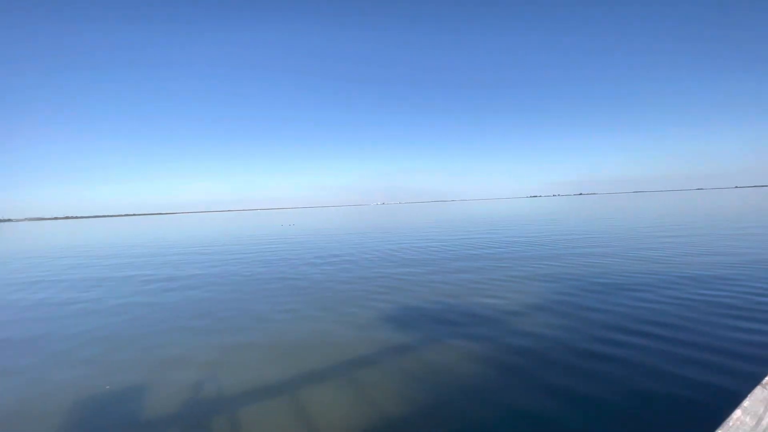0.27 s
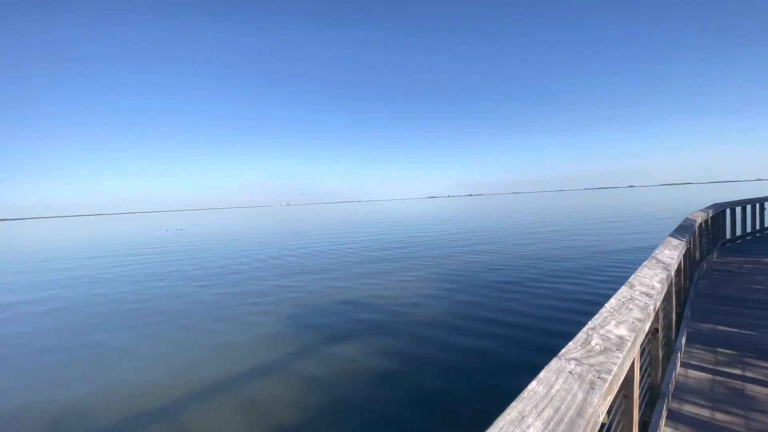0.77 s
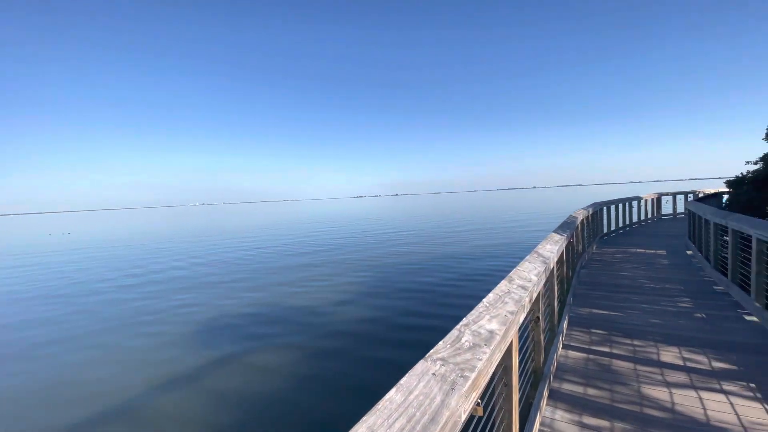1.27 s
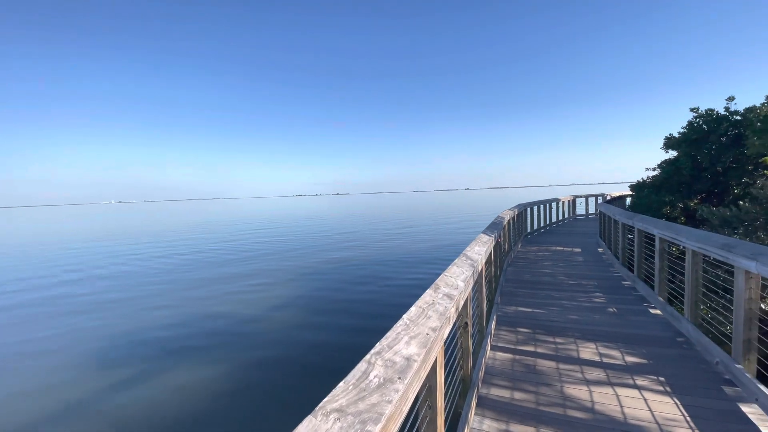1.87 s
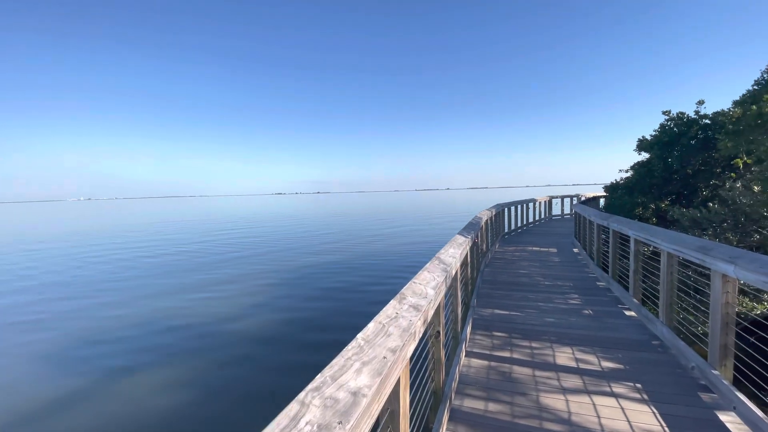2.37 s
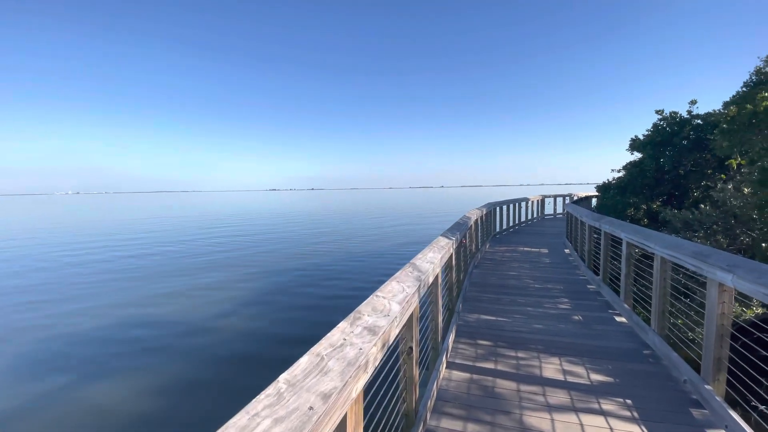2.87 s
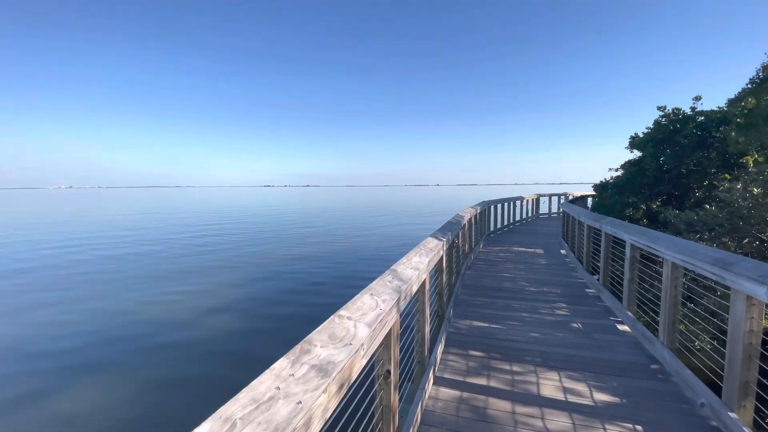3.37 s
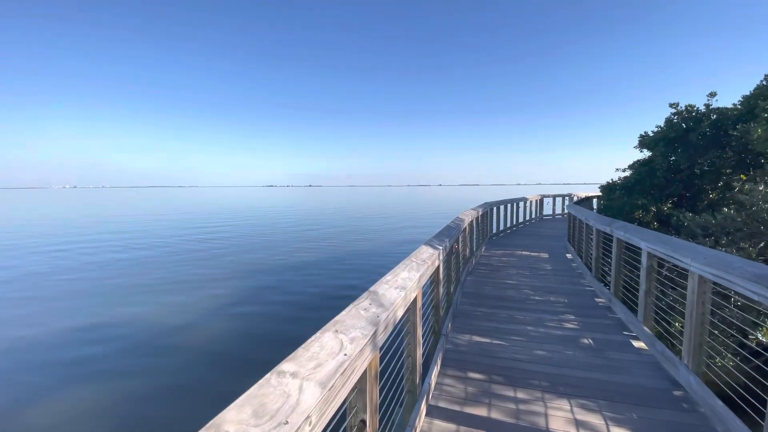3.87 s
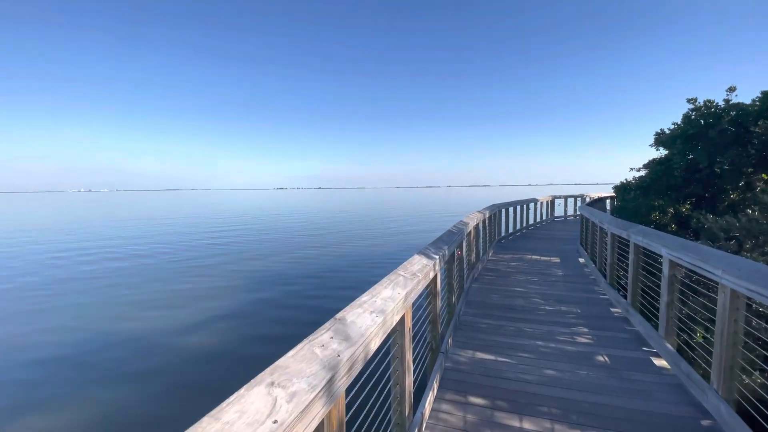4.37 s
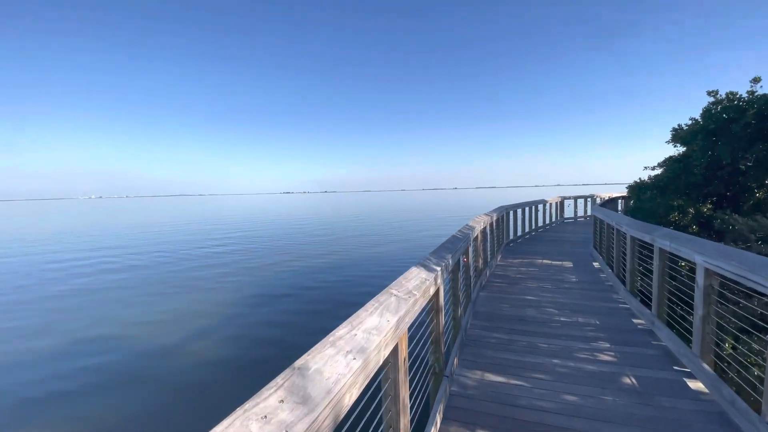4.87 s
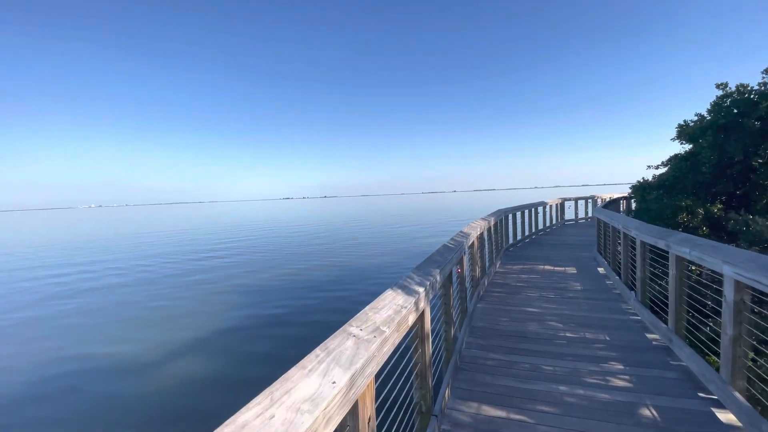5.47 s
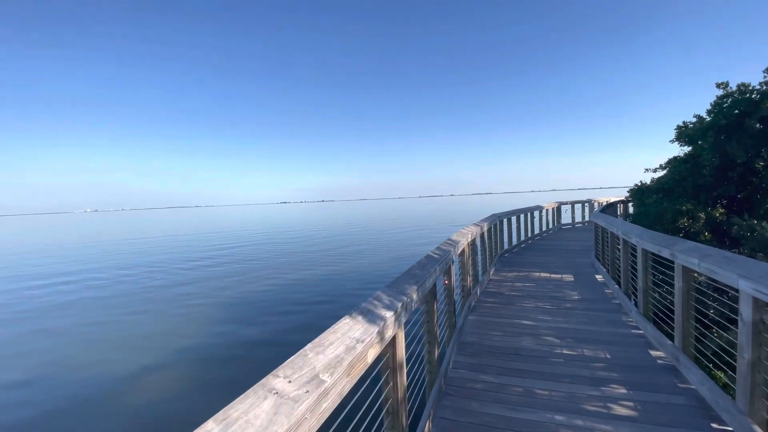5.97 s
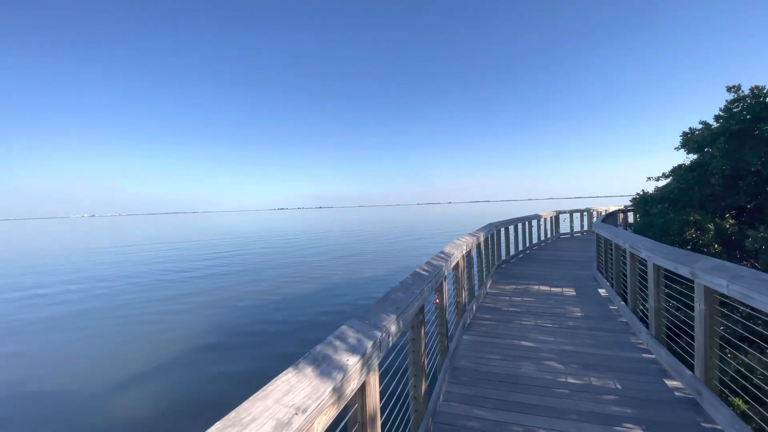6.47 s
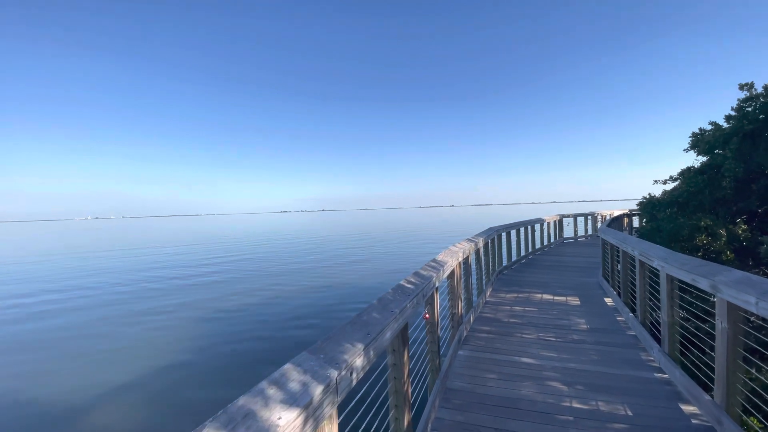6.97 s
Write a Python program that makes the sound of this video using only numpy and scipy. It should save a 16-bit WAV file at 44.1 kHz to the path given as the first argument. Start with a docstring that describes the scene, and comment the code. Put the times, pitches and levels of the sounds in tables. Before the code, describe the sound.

A steady low rumble of far traffic and humming engines fills the open air by calm water. Near the microphone, one walker shuffles and turns on wooden planks, lands a hard clack, then strolls on with soft, dry, gritty footfalls, scuffs and small plank creaks. Distant birds whistle very faintly at first; a nearer one rasps briefly on the left later. Low air buffets brush the microphone, with almost no reverberation.

```python
"""Footsteps on a waterside boardwalk

Someone turns from the rail and strolls along a wooden boardwalk beside calm water.
Soles slide and scuff as flickering noise with tiny wood rings; taps, creaks and clacks ring the planks.
Behind them, shaped noise makes far traffic and a shore murmur, and wavering tones make engines.
Low noise puffs touch the microphone; far birds whistle in gliding tones and a nearer one rasps chips."""
import sys
import numpy as np
from scipy import signal
from scipy.fft import rfft, irfft, next_fast_len
from scipy.io import wavfile
from scipy.ndimage import uniform_filter1d

SR = 44100
rng = np.random.default_rng(int(sys.argv[2]) if len(sys.argv) > 2 else 0)


def put_to_file(sound):
    """Save the sound as 16-bit audio at rate SR, in the file named by the first command-line argument."""
    columns = np.atleast_2d(sound).T  # one column per channel
    safe = np.clip(columns, -1, 1)
    whole_steps = np.round(safe * 32767)
    wavfile.write(sys.argv[1], SR, whole_steps.astype(np.int16))


N = 318402
TIME = np.arange(N) / SR

# In these tables, rise, fall, attack, release and half length run between full height and a tenth of it.
# Soles turning on the deck. Each row: start of full pressure in seconds, length in seconds, level in dB,
# attack in seconds, release in seconds, groan in dB at the end, hiss in dB (both beside the level).
PIVOTS = [(0.307, 0.18, -62.5, 0.12, 0.064, -19, -0.5), (1.322, 0.069, -55, 0.0071, 0.014, 1, 1.5)]
# Stray brushes of a shoe. Each row: peak in seconds, level in dB, half length in seconds, treble in dB.
SCUFFS = [(0.983, -61, 0.05, -23), (1.022, -68.5, 0.016, 12), (1.356, -51.5, .022, -1),
          (1.723, -60.5, 0.067, -25), (1.797, -77, 0.038, -24), (1.953, -75, .04, 5),
          (1.973, -72, 0.016, 7), (2.263, -61.5, 0.022, -19), (2.43, -69, 0.021, -1),
          (2.512, -60.5, 0.032, -1.5), (2.85, -75, 0.069, 4.5), (3.503, -65.5, 0.013, 6.5),
          (3.603, -57.5, 0.076, -16.5), (3.71, -73, .03, 1), (4.082, -64.5, .03, -2.5),
          (4.191, -72, .02, -2), (4.519, -65.5, 0.092, -4.5), (4.697, -63.5, 0.044, -1),
          (4.726, -57, 0.017, -3), (4.822, -66, .03, -10), (4.89, -58.5, 0.059, -18),
          (6.255, -60, 0.053, -0.5), (6.322, -62.5, 0.033, -7.5), (6.852, -57, .018, -16),
          (7.138, -68, .012, 1)]
# Heels and toes knocking. Each row: peak in seconds, level in dB, length scale in seconds,
# ring pitch in Hz, treble in dB before a shared offset.
TAPS = [(0.228, -57, .003, 2400, -8), (0.26, -50, 0.0023, 2840, -2), (0.288, -45.5, .003, 2050, -7),
        (0.302, -49, 0.003, 1970, -13), (1.361, -40.5, .004, 1600, -13), (1.39, -42.5, .003, 1300, -6),
        (1.553, -46, 0.0044, 1530, -5), (1.6318, -36, 0.0034, 1390, -1), (1.635, -36, 0.0033, 1750, -7),
        (2.052, -60, .005, 1780, -14), (2.348, -40, 0.0056, 2150, -6.5), (2.353, -41.5, 0.0051, 2600, -3.5),
        (2.421, -54, 0.0068, 2310, -8), (2.433, -57, .007, 3220, 2), (2.512, -53, 0.0055, 1690, -4),
        (2.665, -51, 0.0074, 2700, 11), (2.688, -57, 0.0036, 1700, -10), (3.308, -50, 0.005, 2300, -9),
        (3.552, -48, 0.0094, 1330, -7), (3.933, -52, .007, 2320, -8), (3.985, -54, .004, 2500, -2),
        (4.011, -50, .007, 2260, -8), (4.175, -56, 0.0044, 2400, -3), (4.655, -47, .003, 1406, 3.5),
        (4.6633, -45, 0.0026, 1600, 2.5), (4.665, -43, 0.0024, 2840, -8), (4.734, -51, .003, 1700, -4),
        (4.758, -49, 0.005, 1400, -3), (4.923, -49.5, 0.0066, 1460, -4), (4.935, -59.5, 0.014, 1610, 6.5),
        (5.41, -57, 0.0031, 1600, -12), (5.486, -59, 0.0027, 1500, -3), (6.185, -46, 0.006, 1950, 3.5),
        (6.405, -60, 0.012, 2220, -4), (6.726, -52, 0.0056, 2650, 11), (6.941, -45.5, 0.0073, 1270, -4),
        (6.949, -51, 0.0044, 1900, 0)]
# Colour of a sole on wood. Each row: frequency in Hz, relative level in dB.
SOLE_COLOUR = [(300, -18.5), (700, -7.5), (1250, 1), (1900, 0.5), (3100, -3.5), (4200, -8.5), (5600, -6.5),
               (7000, -10.5), (8400, -6), (10500, -16), (12500, -18.5), (14500, -24.5)]
# Colours of far traffic, before filters. Each row: frequency in Hz, relative level in dB.
RUMBLE_COLOUR = [(12, -59), (20, -32.5), (27, -13), (29, -31.5), (40, -13), (56, -2), (76, 1.5),
                 (113, -3.5), (134, 0.5), (154, 1.5), (173, -8.5), (275, -17), (304, -23.5), (400, -21.5),
                 (520, -44.5), (880, -120)]
ROAD_COLOUR = [(150, -8), (250, 10), (330, 6), (450, 3.5), (680, 5.5), (850, -3.5), (1100, -9), (1500, -30),
               (2200, -39.5), (3200, -35.5), (5000, -34), (9000, -39), (12000, -44.5), (15000, -57.5)]
# Steadier motors further off. Each row: pitch in Hz, level in dB, start and end of full level in seconds.
HUMS = [(70.85, -51, -10, 8), (93.4, -49, -4.5, 3.9), (120.6, -47.5, 3.4, 6.72), (177.9, -57, -2.5, 1.15),
        (247.8, -66.5, 2, 8), (378.8, -71.5, 0, 8)]
# Air on the microphone. Each row: peak in seconds, level in dB before the port filter,
# half length in seconds, left over right in dB.
PUFFS = [(0.911, -31.5, 0.066, -1.5), (1.29, -37.5, 0.62, 1), (5.891, -23.5, 0.019, 18),
         (6.34, -35, 0.36, -0.5)]
# Falling whistles. Each row: start in seconds, length in seconds, first pitch in Hz, last pitch in Hz,
# level in dB at the end of its growth, bend (1 falls evenly, more holds the pitch longer).
WHISTLES = [(0.03, 0.19, 2240, 1780, -74, 2.2), (0.535, 0.23, 2190, 1740, -74, 1.7),
            (0.94, 0.13, 3970, 2670, -80.5, 1.1), (1.185, 0.115, 2030, 1800, -74, 1.4)]
# A near bird's dry chips. Each row: peak in seconds, level in dB before panning, half length in seconds.
CHIPS = [(4.393, -53.5, 0.0045), (4.405, -51.5, 0.01), (4.513, -58.5, 0.013)]
# Each row: frequency in Hz, likeness of left and right (limited to 1 in use).
LIKENESS = [(60, 0.75), (130, 0.7), (280, 0.7), (610, 0.1), (1300, 0), (3000, 0), (9000, 0), (13000, 1.5)]
# Each row: frequency in Hz, left over right in dB.
BALANCE_DB = [(60, -2.5), (200, -3), (400, -1), (1200, -0.7), (2200, -2), (4000, 2), (5500, 3.5), (7200, 2),
              (8300, -2), (9400, -13.5), (10300, -2.5), (11200, 0)]
# Treble colour of the microphone ports. Each row: frequency in Hz, gain in dB.
PORT_COLOUR = [(7500, -1.5), (8600, -1.5), (9400, 1), (10500, -2.5)]
# Lead of the left port for sound from the feet. Each row: frequency in Hz, lead in radians.
FOOT_PHASE = [(1200, 0.73), (2100, 1.23), (2800, 1.44), (4400, 1.55), (5700, 2.54), (7700, 7.9),
              (9100, 7.66), (10500, 13), (13500, 10)]
# What every tap rings with. Each row: frequency in Hz, width in Hz, relative level in dB.
PLANK_MODES = [(860, 61, 3), (1130, 110, 10), (1890, 67, -16.5), (2360, 330, -9.5), (3070, 140, 4)]
# Strides. Each row: time the sole comes flat in seconds, level in dB, seconds from heel landing to flat,
# seconds from flat to toe push, toe level in dB, treble in dB.
STRIDES = [(1.636, -59, .135, .33, -72, -2.5), (2.674, -63.5, 0.27, 0.12, -67, -0.5),
           (3.311, -55, 0.069, 0.21, -65.5, -2), (4.007, -58, 0.079, 0.2, -80, 1.5),
           (4.753, -57.5, 0.1, 0.16, -70, -2), (5.422, -59, 0.067, 0.054, -66, 3.5),
           (6.184, -59.5, 0.021, .23, -59, 1.5), (6.943, -60.5, 0.096, 0.2, -66, 3.5)]
# Grit snapping under a sole. Each row: peak in seconds, level in dB before SNAP_DB.
SNAPS = [(0.215, -59), (1.553, -51.5), (1.598, -54), (1.968, -66), (2.076, -70), (2.257, -60), (2.273, -61),
         (2.7805, -54), (2.811, -54.5), (3.065, -62), (3.226, -54), (3.7852, -60), (3.8978, -54),
         (3.984, -45), (4.1747, -49), (4.2293, -60), (5.135, -64), (5.21, -60), (5.4652, -51), (5.478, -49),
         (5.487, -45), (5.648, -61), (5.865, -61.5), (5.955, -62.5), (6.48, -64), (6.56, -61)]
# The far road's roar. Each row: time in seconds, level in dB before a shared offset.
ROAD_LEVEL = [(0.05, -58), (2.03, -55), (2.48, -52.5), (2.8, -54.5), (4.12, -54.5), (7.15, -57)]
# The engine's octave comes through once: peak in seconds, level in dB, half length in seconds.
OCTAVE_SWELL = (2.57, -58.5, 0.39)
# The shore's murmur. Each row: time in seconds, level in dB.
SHORE_LEVEL = [(0.1, -75.5), (0.85, -76), (1.3, -73.5), (1.7, -69), (2.5, -70.5), (3.1, -71), (4.1, -67.5),
               (5.6, -70), (6.4, -73), (6.65, -76), (7.1, -63)]
# A loaded board slips against its neighbour. Each row: peak in seconds, peak level in dB before roughness,
# rise in seconds, fall in seconds, centre pitch in Hz.
CREAKS = [(1.321, -36.5, .005, 0.002, 2190), (1.3255, -46, .002, .004, 2150),
          (1.366, -40.5, 0.0044, 0.0048, 2050), (1.3785, -45.5, .002, .0015, 3000),
          (2.349, -47.5, 0.0051, .006, 2130), (5.372, -54, .004, .006, 2500),
          (6.129, -58, .004, .006, 2450), (6.7227, -43.5, 0.0016, 0.0023, 2850),
          (6.905, -54, 0.0018, .004, 2810)]
# A hard heel edge clacks on a board and bounces. Each row: start in seconds, level in dB.
CLACKS = [(1.6356, -30), (1.6375, -41), (1.6404, -38), (4.6627, -46.5), (4.665, -48.5)]
# What a clack rings with. Each row: frequency in Hz, time to fall 60 dB in seconds, relative level in dB.
CLACK_MODES = [(1230, .012, -9), (1830, 0.01, 2.5), (2850, 0.0078, -9.5), (3450, .006, -10.5),
               (5600, .004, -11), (7700, .004, -15.5)]
# The far engine. Each row: time in seconds, pitch in Hz, level in dB as the air carries it over the water.
ENGINE = [(0, 139.4, -40.5), (0.7, 136.2, -40.5), (1.4, 134.3, -43.5), (1.8, 136, -51), (2.15, 136.4, -42),
          (2.5, 138, -47), (3.0, 141.8, -42), (3.5, 145.5, -36), (4.1, 146.4, -47), (4.6, 148, -49.5),
          (5.2, 149.2, -42), (6.0, 152.5, -44.5), (6.6, 150.7, -42), (7.2, 147, -43)]

FOOT_LIKENESS = 0.67  # how alike the two ports hear the feet
TREBLE_HZ, CUTOFF_HZ = 4000, 14200  # start of a rub's treble; top of the whole sound
# Parts of a stride; the dB values are added to the level or treble in its row, except TOE_TREBLE_DB.
ROLL_DB, ROLL_ATTACK_S, ROLL_RELEASE_S = -9.5, 0.03, 0.075
FLAT_RISE_S, FLAT_FALL_S = 0.047, 0.045
STANCE_DB, STANCE_RELEASE_S, STANCE_TREBLE_DB = -3, 0.25, -4.5
TOE_RISE_S, TOE_FALL_S, TOE_TREBLE_DB = 0.026, 0.035, 0
SNAP_DB, SNAP_RISE_S, SNAP_FALL_S = -5, 0.00089, 0.0073
RUMBLE_DB, OCTAVE_DB = -37, -66.5
CRACKLE_DB, CRACKLES_PER_S, CRACKLE_WIDTH_HZ = -8.5, 170, 120
ROAD_PATCH_DB, WOOD_PATCH_DB, GRIT_PATCH_DB, SHORE_PATCH_DB = 2.5, 5, 2, 3.8  # uneven flicker of each colour
PIVOT_BRIGHTEN_DB = 5.5  # growth of a slide's hiss over its first half
PIVOT_CRACKLE_DB = -6.5  # jerky slips within a slide
DULL_HZ, EDGE_FOLLOWS = 2500, 0.63  # soft rubs lose this share of their treble loss above this pitch
CREAK_WAVER, CREAK_ROUGH_DB = 0.055, 3  # share of the pitch; unevenness of the slips
ENGINE_WAVER_DB = 1.5
WHISTLE_GROWTH_DB, WHISTLE_WAVER_HZ, WHISTLE_FLUTTER_DB = 9, 24, 3.5


def from_db(db):
    """Decibels to gain."""
    return 10 ** (np.asarray(db) / 20)


def rms_one(x):
    """Scale to unit power."""
    return x / np.sqrt(np.mean(x ** 2) + 1e-20)


def in_time(rows):
    """Read each column of a curve at every sample."""
    s, *columns = np.transpose(rows)
    return [np.interp(TIME, s, c) for c in columns]


def per_bin(points):
    """Read a table at every frequency bin, along log frequency."""
    hz, value = np.transpose(points)
    bins_hz = np.fft.rfftfreq(next_fast_len(N), 1 / SR) + 1
    return np.interp(np.log(bins_hz), np.log(hz), value)


def filtered(x, gain):
    """Apply a gain over frequency."""
    size = next_fast_len(N)
    return irfft(rfft(x, size) * gain, size)[..., :N]


def band(low_hz, high_hz):
    """Gain that passes a band and falls away on both sides."""
    hz = np.fft.rfftfreq(next_fast_len(N), 1 / SR) + 1
    away = (hz * hz - low_hz * high_hz) / (hz * (high_hz - low_hz))
    return 1 / np.sqrt(1 + away ** 6)


def noise(gain):
    """Coloured stereo noise, alike between the ears as LIKENESS says; rms 1."""
    alike = np.clip(per_bin(LIKENESS), -1, 1)
    mid, side = filtered(rng.standard_normal((2, N)), gain * np.sqrt([1 + alike, 1 - alike]))
    return rms_one(np.array([mid + side, mid - side]))


def at_ports():
    """Phase shift at the two ports for sound from the feet."""
    return np.exp(1j * per_bin(FOOT_PHASE) * np.array([[.5], [-.5]]))


def close_noise(gain):
    """Noise from a small near source: both ports hear much the same, shifted in phase; rms 1."""
    alike = np.clip(FOOT_LIKENESS, 0, 1)
    shared, *own = rng.standard_normal((3, N))
    both = np.sqrt(alike) * shared + np.sqrt(1 - alike) * np.array(own)
    return rms_one(filtered(both, gain * at_ports()))


def drift(rate):
    """Random curve of rms 1, moving to a new value rate times a second."""
    return rms_one(np.interp(TIME * rate, np.arange(N), rng.standard_normal(N)))


def swell(s, rise, fall, shape):
    """A bump of height 1 at s, a tenth as high one rise before and one fall after."""
    away = np.maximum((s - TIME) / rise, (TIME - s) / fall)
    out, near = np.zeros(N), away < 5
    out[near] = 10 ** -(away[near] ** shape)
    return out


def stroke(s, length, attack, release):
    """Height 1 from s for the length, a tenth as high one attack before and one release after."""
    away = np.maximum((s - TIME) / attack, (TIME - s - length) / release)
    return 10 ** -np.clip(away, 0, 8)


def patchy(x, spread_db, size):
    """Stretches of the spectrum swell and fade at random, narrower and slower for a larger size; rms 1."""
    cells = signal.stft(x, nperseg=size)[2]
    field = uniform_filter1d(rng.standard_normal(cells.shape[1:]), size=2, axis=0)
    field = uniform_filter1d(field, size=6, axis=1)
    gain = from_db(spread_db * np.clip(rms_one(field), -2, 2))
    return rms_one(signal.istft(cells * gain, nperseg=size)[1][:, :N])


def resonate(x, hz, width_hz):
    """One resonance with gain about 1 at its pitch."""
    r = np.exp(-np.pi * width_hz / SR)
    feedback = [1, -2 * r * np.cos(2 * np.pi * hz / SR), r * r]
    return signal.lfilter([(1 - r * r) / 2, 0, (r * r - 1) / 2], feedback, x + 1e-18)


def scatter_tail(x, t60, wet_db):
    """Surroundings such as posts and rails scatter sound into a short, fading noise tail."""
    t = TIME[:SR // 2]
    scatter = rng.standard_normal((2, len(t))) * from_db(-60 * t / t60) * (t > .005)
    scatter /= np.sqrt(np.sum(scatter ** 2, axis=1, keepdims=True))
    return x + from_db(wet_db) * signal.fftconvolve(x, scatter, axes=1)[:, :N]


def traffic():
    """Deep rumble and patchy road roar, both shaped noise, carried over the water."""
    road_db, = in_time(ROAD_LEVEL)
    dip = 1 - 0.54 * band(134.3, 166.0)
    rumble = noise(from_db(per_bin(RUMBLE_COLOUR)) * band(24, 352) * dip)
    road = patchy(noise(from_db(per_bin(ROAD_COLOUR))), ROAD_PATCH_DB, size=1536)
    return from_db(RUMBLE_DB) * rumble + from_db(road_db + 3.5) * road


def engines():
    """Firing tones, with one octave, that fade in and out on the long way through the air."""
    hz, firing_db = in_time(ENGINE)
    s, db, half = OCTAVE_SWELL
    octave = from_db(OCTAVE_DB) + from_db(db) * swell(s, half, half, shape=2.3)
    phase = 2 * np.pi * np.cumsum(hz) / SR + 0.13 * drift(7)
    tones = from_db(firing_db) * np.sin(phase) + octave * np.sin(2 * phase + 0.37 * drift(12))
    out = from_db(ENGINE_WAVER_DB * drift(9.8)) * tones
    for hum_hz, hum_db, start, end in HUMS:
        # half-second fades lie outside the start and end
        present = np.clip(2 * np.minimum(TIME - start, end - TIME) + 1, 0, 1)
        fading = from_db(hum_db + 3.1 * drift(3.7)) * present
        out += fading * np.sin(2 * np.pi * hum_hz * TIME + 0.93 * drift(4))
    return np.sqrt(2) * out  # a sine's level now counts as rms


def shore():
    """A faint, restless murmur of small far sounds: patchy noise in the upper midrange."""
    colour = band(970, 1265) + from_db(-8.5) * band(1200, 2150) + from_db(-22.0) * band(1600, 3400)
    murmur = patchy(noise(colour), SHORE_PATCH_DB, size=640)
    level_db, = in_time(SHORE_LEVEL)
    return from_db(level_db) * murmur


def clothes(level_db, flicker_db):
    """Fabric whispers faintly as flickering treble noise."""
    whisper = close_noise(from_db(per_bin(SOLE_COLOUR)) * band(3900, 13000))
    return from_db(level_db + flicker_db * drift(17)) * whisper


def grit(per_s, level_db, spread_db):
    """Stray grains tick faintly at random moments, each a tiny burst of noise."""
    ticks = np.zeros(N)
    for when, size in rng.random((int(per_s * N / SR), 2)):
        ticks += from_db(level_db + spread_db * size) * swell(when * N / SR, 0.0018, 0.0049, shape=1)
    return ticks * close_noise(from_db(per_bin(SOLE_COLOUR)))


def wildlife():
    """Far birds whistle in falling tones; a near bird's two bands of noise rasp in chips on the left."""
    whistles = np.zeros((2, N))
    for s, length, from_hz, to_hz, db, bend in WHISTLES:
        along = np.clip((TIME - s) / length, 0, 1)
        hz = from_hz + (to_hz - from_hz) * along ** bend + WHISTLE_WAVER_HZ * drift(90)
        level_db = db + WHISTLE_GROWTH_DB * (along - 1) + WHISTLE_FLUTTER_DB * drift(45)
        rounded = np.abs(np.sin(np.pi * along)) ** 0.31
        whistles += from_db(level_db) * rounded * np.sin(2 * np.pi * np.cumsum(hz) / SR)
    chips = sum(from_db(db) * swell(s, half, half, shape=0.9) for s, db, half in CHIPS)
    rasp = noise(band(7600, 8330) + 0.41 * band(4360, 8400)) * from_db([[4], [-7]])
    return scatter_tail(whistles, t60=0.2, wet_db=-4.0) + scatter_tail(chips * rasp, t60=0.15, wet_db=-8.0)


def friction(grit_db, patchy_db=4.5):
    """Body and treble of a sole on grit: its catch changes hundreds of times a second, its colour flickers."""
    colour, edges = from_db(per_bin(SOLE_COLOUR)), np.geomspace(400, 16000, 12)
    catches = rms_one(from_db(grit_db * (drift(700) + 0.91 * drift(110))))
    body, treble = np.zeros((2, 2, N))
    for low, high in zip(edges, edges[1:]):
        gain = colour * band(low, high)
        zone = np.linalg.norm(gain) * close_noise(gain) * from_db(patchy_db * drift(70))
        if low < TREBLE_HZ:
            body += zone
        else:
            treble += zone
    return rms_one(body) * catches, rms_one(treble) * catches


def crackles(spread_db):
    """The sole slips in small jerks, each briefly ringing a different spot of the wood; rms 1."""
    chance, size, spot = rng.random((3, N))
    slips = (chance < CRACKLES_PER_S / SR) * from_db(spread_db * size ** 2) * rng.choice([-1, 1], N)
    pitches = np.geomspace(1100, 3600, 18)
    dealt = (spot * len(pitches)).astype(int)
    rings = sum(resonate(slips * (dealt == k), hz, CRACKLE_WIDTH_HZ) for k, hz in enumerate(pitches))
    return rms_one(filtered(rings, from_db(per_bin(SOLE_COLOUR)) * at_ports()))


def pivots():
    """Two slides as the walker turns: friction crackles, its hiss grows and a groan swells to the end."""
    body, treble = friction(grit_db=0.6, patchy_db=2.0)
    wood = from_db(4.0) * body + from_db(PIVOT_CRACKLE_DB) * crackles(spread_db=15)
    groan, out = close_noise(band(750, 1300)), 0
    for s, length, db, attack, release, groan_db, hiss_db in PIVOTS:
        along = np.clip((TIME - s) / length, 0, 1)
        hiss = from_db(hiss_db + PIVOT_BRIGHTEN_DB * np.minimum(2 * along - 1, 0)) * treble
        slide = wood + hiss + from_db(groan_db) * along ** 2 * groan
        out = out + from_db(db) * stroke(s, length, attack, release) * slide
    return out


def snaps():
    """The larger grains break with a short, bright tick of noise."""
    force = sum(from_db(db + SNAP_DB) * swell(s, SNAP_RISE_S, SNAP_FALL_S, shape=0.83) for s, db in SNAPS)
    bright = band(4000, 14500) + from_db(-11.5) * band(1200, 4000)
    return force * close_noise(from_db(per_bin(SOLE_COLOUR)) * bright)


def taps(ring_width_hz, ring_db, plank_db, crack_db):
    """The sole knocks at its own pitch, the plank rings briefly and grit cracks on top."""
    crack = close_noise(from_db(per_bin(SOLE_COLOUR)) * band(4000, 14000))
    chatter, out = close_noise(band(600, 3900)), np.zeros((2, N))
    for s, db, length, hz, treble_db in TAPS:
        near = slice(int((s - .05) * SR), int((s + .07) * SR))
        force = from_db(db) * swell(s, 0.83 * length, 1.78 * length, shape=0.66)[near]
        blow = force * chatter[:, near]
        knock = resonate(resonate(blow, hz, ring_width_hz), hz, ring_width_hz)
        plank = 0
        for k, (mode_hz, width_hz, mode_db) in enumerate(PLANK_MODES):
            plank = plank + (-1) ** k * from_db(mode_db) * resonate(blow, mode_hz, width_hz)
        weight = min(1, 1750 / hz) ** 6  # dull heel blows drive the plank more than light toe taps
        shares = from_db(ring_db) * rms_one(knock) + weight * from_db(plank_db) * rms_one(plank)
        shares += from_db(treble_db + crack_db) * rms_one(force * crack[:, near])
        out[:, near] += np.sqrt(np.mean(force ** 2)) * shares
    return out


def puffs():
    """Soft low buffets of moving air; the deepest part does not get through the ports."""
    air, out = noise(band(55, 97.7)), np.zeros((2, N))
    for s, db, half, pan_db in PUFFS:
        push = swell(s, half, half, shape=1.37)
        sides = from_db(db + pan_db * np.array([[.5], [-.5]]))
        out += sides * np.sqrt(np.mean(push ** 2)) * rms_one(push * air)
    return filtered(out, band(45, 200))


def contacts():
    """Each rub as force and treble dB: a stride rolls from the heel, comes flat, bears weight, pushes off."""
    for s, db, heel_s, toe_s, toe_db, treble_db in STRIDES:
        yield from_db(db + ROLL_DB) * stroke(s - heel_s, heel_s, ROLL_ATTACK_S, ROLL_RELEASE_S), treble_db
        yield from_db(db) * swell(s, FLAT_RISE_S, FLAT_FALL_S, shape=1.36), treble_db
        stance = from_db(db + STANCE_DB) * swell(s, FLAT_RISE_S, STANCE_RELEASE_S, shape=0.53)
        yield stance, treble_db + STANCE_TREBLE_DB
        yield from_db(toe_db) * swell(s + toe_s, TOE_RISE_S, TOE_FALL_S, shape=0.69), TOE_TREBLE_DB
    for s, db, half, treble_db in SCUFFS:
        yield from_db(db) * swell(s, half, half, shape=1.0), treble_db


def crunch_grains(per_s, spread_db):
    """Single grains cracking under a sole: many small clicks and a few large ones; rms 1."""
    chance, size = rng.random((2, N))
    clicks = (chance < per_s / SR) * from_db(spread_db * size ** 2) * rng.choice([-1, 1], N)
    return rms_one(filtered(clicks, from_db(per_bin(SOLE_COLOUR)) * band(900, 13000) * at_ports()))


def scuffs():
    """Rubbing force drives wood friction, crackles and crunching grit; soft rubs favour the lower wood."""
    body, treble = friction(grit_db=2.6, patchy_db=3.0)
    body_power, edge_power, treble_power = np.zeros((3, N))
    for force, treble_db in contacts():
        body_power += force ** 2
        edge_power += (force * from_db(EDGE_FOLLOWS * min(treble_db, 0))) ** 2
        treble_power += (force * from_db(treble_db)) ** 2
    wood = patchy(body, WOOD_PATCH_DB, size=512) + from_db(CRACKLE_DB) * crackles(spread_db=9.5)
    dull = filtered(wood, band(100, DULL_HZ) ** 2)
    crunch = from_db(-8) * crunch_grains(per_s=250, spread_db=8.5)
    gritty = from_db(-2.0) * patchy(treble, GRIT_PATCH_DB, size=256) + crunch
    return np.sqrt(body_power) * dull + np.sqrt(edge_power) * (wood - dull) + np.sqrt(treble_power) * gritty


def creaks():
    """Wood sticks and slips so fast that it sings, a wavering tone of a few milliseconds."""
    waver, out = 1 + CREAK_WAVER * drift(500), np.zeros(N)
    for s, db, rise, fall, hz in CREAKS:
        near = slice(int((s - .03) * SR), int((s + .07) * SR))
        tone = np.sin(2 * np.pi * np.cumsum(hz * waver[near]) / SR)
        out[near] += from_db(db) * swell(s, rise, fall, shape=1.05)[near] * tone
    return filtered(out * from_db(CREAK_ROUGH_DB * drift(900)), at_ports())


def clacks():
    """Single hard contacts set a board's damped modes ringing."""
    t, out = TIME[:SR // 20], np.zeros(N)
    ring = sum(from_db(db - 60 * t / t60) * np.sin(2 * np.pi * hz * t) for hz, t60, db in CLACK_MODES)
    for s, db in CLACKS:
        start = int(s * SR)
        out[start:start + len(t)] += from_db(db) * ring
    return filtered(out, at_ports())


def scene():
    """Steps among the railings, with the shore around them."""
    far = traffic() + engines() + shore() + wildlife()
    walker = clothes(level_db=-92.0, flicker_db=4.0) + grit(per_s=7, level_db=-73.5, spread_db=3.0)
    walker += pivots() + snaps() + taps(ring_width_hz=610, ring_db=-1.5, plank_db=-8.5, crack_db=-9.5)
    walker += scuffs() + creaks() + clacks()
    return scatter_tail(walker, t60=0.16, wet_db=-12.0) + far + puffs()


def record(dry):
    """Each microphone port has its own colour; a steep filter cuts the top."""
    ends = np.clip(np.minimum(TIME, TIME[-1] - TIME) / .004, 0, 1)  # 4 ms fades
    colour_db = per_bin(PORT_COLOUR) + per_bin(BALANCE_DB) * np.array([[.5], [-.5]])
    coloured = filtered(dry * ends, from_db(colour_db))
    return signal.sosfilt(signal.ellip(10, .1, 80, CUTOFF_HZ, fs=SR, output="sos"), coloured)


dry = scene()
out = record(dry)
put_to_file(out)
```